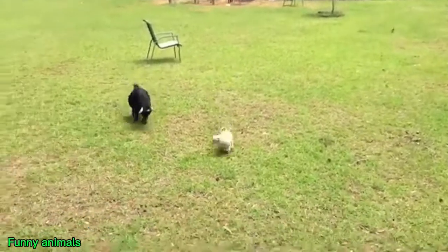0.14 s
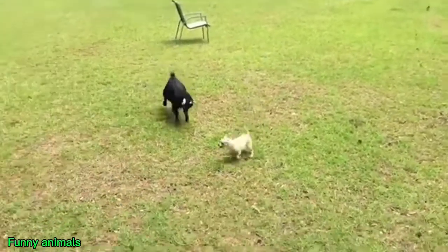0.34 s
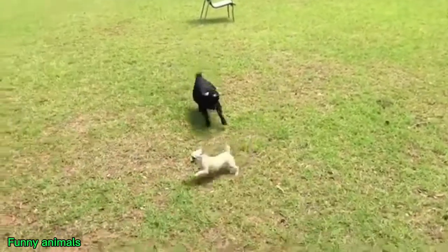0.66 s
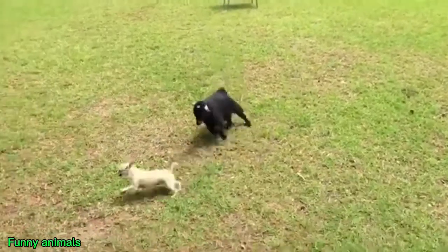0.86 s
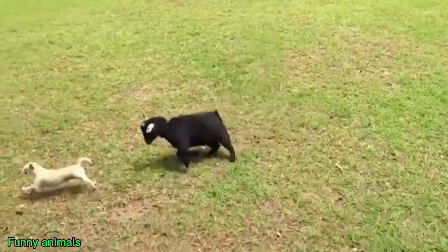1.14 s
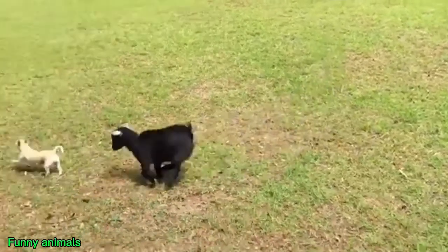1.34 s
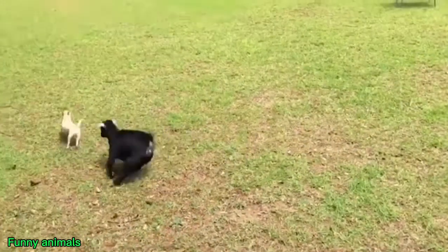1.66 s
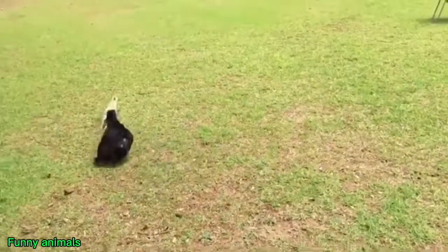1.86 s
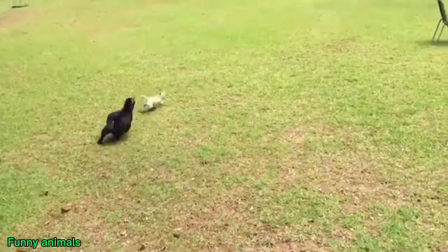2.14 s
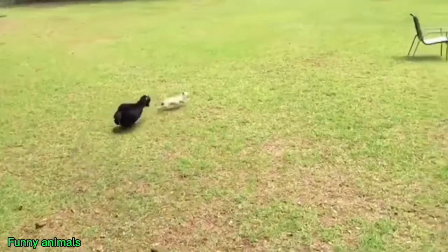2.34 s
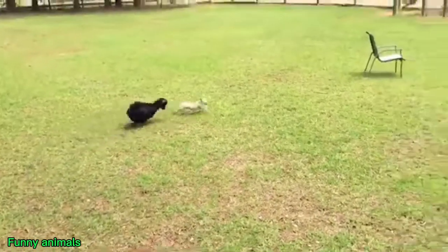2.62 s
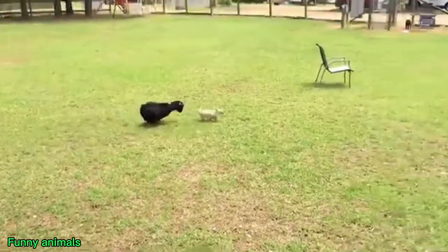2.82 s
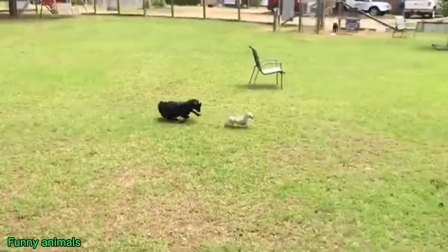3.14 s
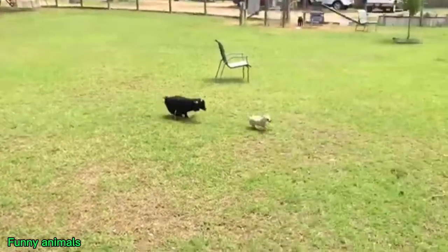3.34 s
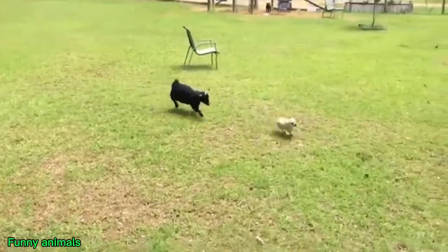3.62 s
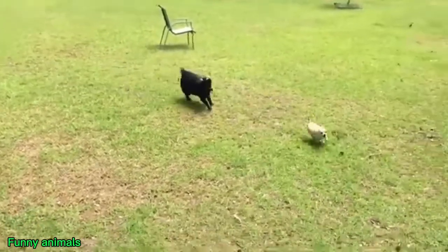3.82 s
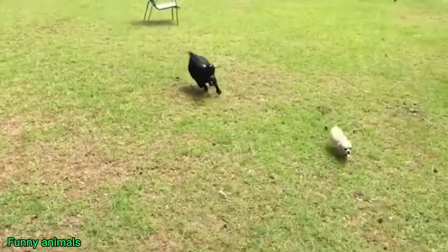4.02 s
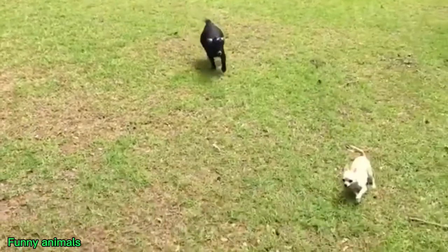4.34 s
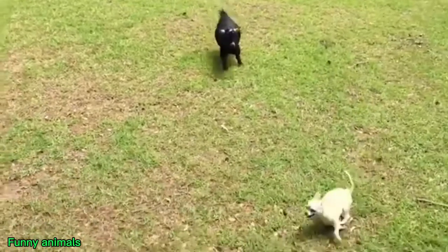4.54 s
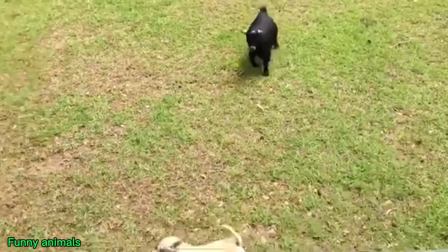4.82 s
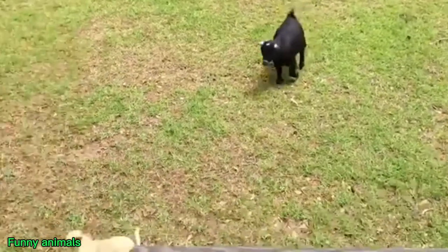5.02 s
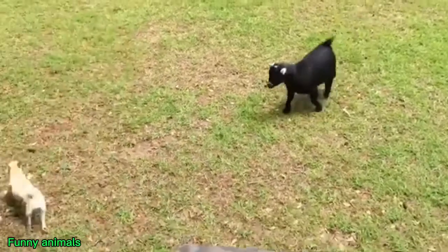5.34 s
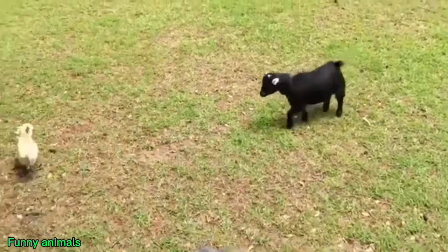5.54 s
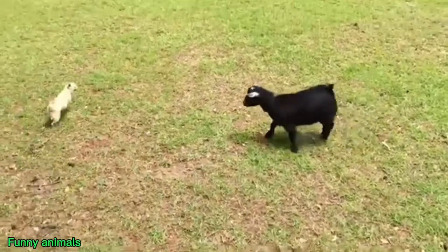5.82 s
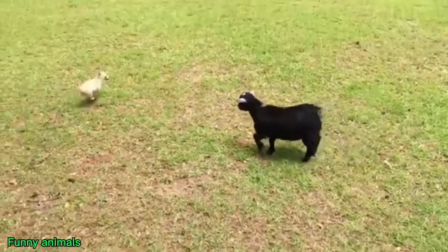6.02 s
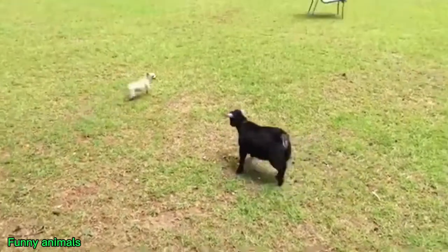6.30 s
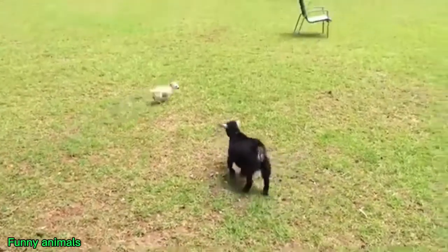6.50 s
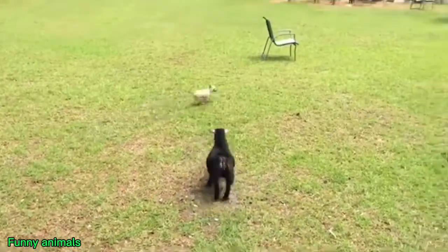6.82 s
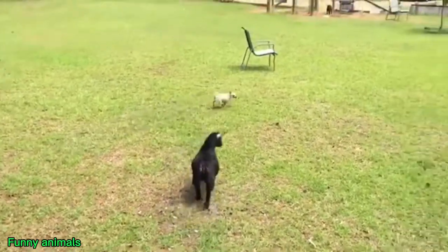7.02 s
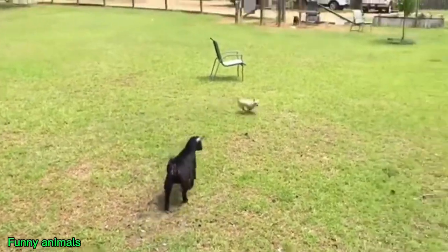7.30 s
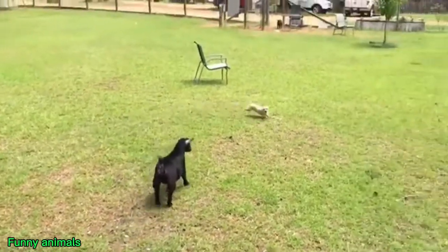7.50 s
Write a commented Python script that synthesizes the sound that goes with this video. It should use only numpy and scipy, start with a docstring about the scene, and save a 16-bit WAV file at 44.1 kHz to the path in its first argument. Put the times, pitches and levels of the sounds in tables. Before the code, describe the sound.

Echoing kennel-like barking runs on and off over a quiet dry-grass rustle with crisp little snaps and scuffs. Small puffs of panting come first, then a bright, shaky goat bleat of about nine throbs, scattered woofs, and a shorter, softer bleat of six. The ending gathers into quick high yaps, yelps and whines. A weak low motor drone lies far behind, with faint wind buffets on the phone microphone.

```python
"""Dogs bark and whine in an echoing kennel from the start; a small dog starts to pant in puffs of shaped noise.
Dry blades hiss, scuff and snap throughout, over a far motor of two wavering tones that swells near 2.8 s.
A goat kid gives a long trembling bleat from 2.1 s and a shorter one from 5.6 s: fold pulses through a throat.
Wind buffets softly near 4.4 s and 7.5 s. Barks are fold pulses through sliding mouth resonances plus a rasp."""
import sys
import numpy as np
from scipy import signal
from scipy.fft import rfft, irfft, next_fast_len
from scipy.io import wavfile
from scipy.ndimage import uniform_filter1d, map_coordinates

SR = 44100
rng = np.random.default_rng(int(sys.argv[2]) if len(sys.argv) > 2 else 0)


def store_pcm(level_fs):
    """Save levels as 16-bit WAV."""
    pcm = np.round(np.clip(level_fs, -1, 1) * 32767).astype(np.int16)
    wavfile.write(sys.argv[1], SR, np.atleast_2d(pcm).T)


N = 337850
TIME = np.arange(N) / SR
TOP_HZ = 15300  # band limit, also of the fold harmonics
LEAD_S = .4  # the dog track starts this much earlier

HARSH_ROUGH, WOOF_ROUGH, YAP_ROUGH = .62, .5, .25  # air share of amplitude
# ways of barking: opening and closing pitch / pitch at the loudest moment [ratio],
# shut / open mouth resonance [ratio], upper resonance and rasp [dB], rough [0-1]
HARSH = dict(opening=.85, closing=.92, shut=0.77, upper_db=-21, rasp_db=-11.5, rough=HARSH_ROUGH)
WOOF = dict(opening=1.12, closing=0.6, shut=0.676, upper_db=-2.5, rasp_db=-28, rough=WOOF_ROUGH)
YELP = dict(opening=.8, closing=0.63, shut=0.52, upper_db=-45, rasp_db=-27, rough=YAP_ROUGH)
YAP = dict(opening=1.04, closing=.85, shut=0.93, upper_db=-16.5, rasp_db=-27.5, rough=YAP_ROUGH)


def amp(db):
    """Decibels to gain."""
    return 10 ** (np.asarray(db) / 20)


def unit(x):
    """Scale to rms 1."""
    return x / np.sqrt(np.mean(x ** 2) + 1e-20)


def along(points, hz):
    """(f/Hz, value) points read on a log frequency axis."""
    f, v = np.transpose(points)
    return np.interp(np.log(hz + 1), np.log(np.maximum.accumulate(f) + 1), v)


def wobble(rate_hz, size):
    """Smooth random curve with rate_hz knots a second."""
    knots = rng.standard_normal(int(size * rate_hz / SR) + 4)
    return map_coordinates(knots, [np.arange(size) * rate_hz / SR])


def colour(x, points):
    """Minimum-phase filter with the gain of the (f/Hz, gain/dB) points."""
    size = 8192
    cepstrum = irfft(np.log(amp(along(points, np.fft.rfftfreq(size, 1 / SR)))))
    # fold onto positive time: causal
    cepstrum[1:size // 2] *= 2
    cepstrum[size // 2 + 1:] = 0
    impulse = irfft(np.exp(rfft(cepstrum)))[:size // 2]
    return signal.fftconvolve(x, impulse)[:len(x)]


def resonate(x, hz, width_hz):
    """One resonance of peak gain 1."""
    return signal.lfilter(*signal.iirpeak(hz, hz / width_hz, SR), x)


def cavity(x, modes):
    """Steep-sided resonances, each run twice, from (f/Hz, width/Hz, gain/dB) rows."""
    return sum(amp(db) * resonate(resonate(x, hz, width), hz, width) for hz, width, db in modes)


def glide(x, hz, count=5):
    """A moving resonance, cross-faded between fixed ones."""
    mouth_q = 4.2
    stops = np.linspace(hz.min() - 1, hz.max() + 1, count)
    shares = np.eye(count)
    return sum(np.interp(hz, stops, share) * resonate(x, stop, stop / mouth_q)
               for stop, share in zip(stops, shares))


def steady(x, size=900):
    """Hold the short-term rms at 1."""
    return x / np.sqrt(np.abs(uniform_filter1d(x ** 2, size)) + 1e-12)


def swells(rows):
    """Rounded swells from (t/s, level/dB, half width/s) rows."""
    return sum(amp(db) * np.exp(-.5 * np.abs((TIME - s) / w) ** 2.6) for s, db, w, *_ in rows)


def add(track, s, x):
    """Mix x into the track at time s."""
    i = max(round(s * SR), 0)
    track[i:i + len(x)] += x[:max(len(track) - i, 0)]


def folds(pitch_hz, rough):
    """Vocal folds: one pulse a cycle, mixed with air escaping in step; rough is the air's amplitude share."""
    phase = 2 * np.pi * np.cumsum(pitch_hz) / SR
    k = np.arange(1, int(TOP_HZ / pitch_hz.mean()) + 1)
    pulses = unit(np.cos(k[:, None] * phase).sum(0))
    air = unit(rng.standard_normal(len(pitch_hz)) * (1 + np.cos(phase)))
    rough = np.clip(rough, 0, 1)
    return np.sqrt(1 - rough ** 2) * pulses + rough * air


def echo(x, t60, delay_s):
    """A diffuse tail in which each frequency dies at its own speed; keeps the level of x."""
    hz, t, z = signal.stft(rng.standard_normal(2 * SR), SR, nperseg=256)
    decay = amp(-60 * t / along(t60, hz)[:, None])
    tail = signal.istft(z * decay, SR, nperseg=256)[1]
    tail *= 1 - np.exp(-(np.arange(len(tail)) / SR / delay_s) ** 2)
    return unit(signal.fftconvolve(x, tail)[:len(x)]) * np.std(x)


def wind():
    """Wind nudging the microphone: soft low buffets of noise."""
    # t/s, level/dB, half width/s
    gusts = [(4.45, -62, 0.23), (7.51, -50, 0.03)]
    buffet = colour(rng.standard_normal(N), [(20, -29), (50, 17), (100, 3), (200, -4), (800, -43)])
    return swells(gusts) * unit(buffet)


def motor():
    """A distant motor: a wavering tone and its lower partner over a soft rumble."""
    # rumble spectrum: f/Hz, gain/dB
    hum = [(15, -61), (25, -25), (60, -12), (130, 0), (200, -11.5), (300, -15.5), (420, -27), (600, -30),
           (1000, -33), (1600, -36), (2500, -37.5), (5500, -100)]

    def tone(hz):
        wave = np.sin(2 * np.pi * np.cumsum(hz + 4 * wobble(25, N)) / SR)
        return unit(wave * amp(3.8 * wobble(27, N)))

    nearness = amp(np.interp(TIME, [0, 2.8, 4.2, 7.6], [-57.5, -51.5, -63.5, -74]))
    rumble = unit(colour(rng.standard_normal(N), hum))
    return nearness * tone(hz=140.2) + amp(-64.5) * tone(hz=75.3) + amp(-56.0) * rumble


def grass():
    """Dry blades: a restless hiss with tiny cracks, scuffs of the feet, and short dry snaps."""
    # rustle, grows as the animals come near: t/s, level/dB before mixing and stirring
    approach = [(0, -68), (.6, -72), (1.1, -68), (2.4, -67.5), (3.0, -68), (4.1, -72), (4.5, -68),
                (5.3, -69.5), (6.3, -73), (7.66, -73.5)]
    # blade spectrum: f/Hz, gain/dB
    blades = [(900, -4), (2500, 0), (5000, 5), (8000, 2.5), (12000, 3), (15500, 2.5)]
    # feet dragging: t/s, level/dB before mixing, half width/s
    scuffs = [(.17, -58, 0.014), (.468, -56, 0.0066), (.95, -62.5, 0.022), (3.16, -60, 0.023),
              (4.41, -76, 0.024), (4.566, -57.5, 0.023), (5.175, -59.5, 0.0077), (5.222, -57.5, 0.014),
              (5.39, -59.5, 0.01), (5.51, -62, 0.0041)]
    # loudest blades snapping underfoot: t/s, peak/dB, ring f/Hz
    snaps = [(.823, -52, 5440), (0.855, -45, 8600), (1.101, -43.5, 5470), (1.236, -49, 8070),
             (1.369, -46.5, 5540), (1.497, -40, 9400), (1.515, -40.5, 7500), (1.92, -41, 9700),
             (2.8835, -44, 4460), (3.115, -43.5, 9500), (3.273, -37, 4700), (3.514, -43.5, 5460),
             (4.098, -50, 5080), (4.356, -40.5, 6500), (4.6253, -40.5, 4830), (4.9664, -43.5, 4550),
             (5.1585, -38.5, 8760), (5.335, -51.5, 4470)]

    def swing(db, rate_hz):
        return amp(db * np.tanh(wobble(rate_hz, N) / 2))

    cracks = (rng.random(N) < 1800 / SR) * rng.standard_normal(N) * swing(14, 45)  # 1800 per s
    hiss = unit(colour(rng.standard_normal(N), blades))
    rustle = amp(-0.5) * hiss + amp(1.0) * unit(colour(cracks, blades))
    stir = swing(6, 13)
    ticks = unit(swing(11, 130))  # a scuff breaks into single blades
    out = rustle * (stir * amp(np.interp(TIME, *np.transpose(approach))) + ticks * swells(scuffs))
    t = TIME[:SR // 20]
    snap_shape = amp(-60 * t / 0.022) * (1 - np.exp(-t / 0.002))
    for s, db, hz in snaps:
        burst = rng.standard_normal(len(t)) * snap_shape
        snap = colour(burst, blades) + 6 * resonate(burst, hz, width_hz=600)
        add(out, s - .001, snap / np.abs(snap).max() * amp(db))
    return out


def whines():
    """Thin arching whines: a strong fundamental, an octave that grows with effort; faint ones quaver most."""
    # t/s, length/s, mid pitch f/Hz, glide/Hz, level/dB
    rows = [(.014, .069, 1054, 276, -46), (.565, .08, 1060, 360, -41), (.667, .053, 1000, -176, -50),
            (2.8, .26, 1345, -50, -62), (3.23, .28, 1235, -30, -64), (5.35, .2, 1220, -28, -60),
            (7.1, .166, 1185, 0, -49), (7.11, .1, 2930, 260, -60), (7.452, .075, 1100, 350, -41.5),
            (7.465, .09, 2930, 360, -60), (7.53, .072, 1200, -62, -49)]
    arch, octave_db = 0.033, -15  # share by which both ends lie low; octave in the loudest whine
    out = np.zeros(N + round(LEAD_S * SR))
    loudest_db = max(db for *_, db in rows)
    for s, length_s, hz, glide_hz, db in rows:
        u = np.linspace(-1, 1, int(length_s * SR))
        quaver_hz = 18 + 1.1 * (loudest_db - db)
        pitch_hz = hz * (1 - arch * u ** 2) + glide_hz * (u / 2 - u ** 2 / 10)
        pitch_hz = pitch_hz + quaver_hz * wobble(300, len(u))
        phase = 2 * np.pi * np.cumsum(pitch_hz) / SR
        octave = np.sin(2 * phase) * wobble(403.0, len(u))  # hoarse
        tone = np.sin(phase) + amp(octave_db + db - loudest_db) * octave
        level = amp(db + 3 * wobble(70, len(u))) * signal.windows.tukey(len(u), .6)
        add(out, LEAD_S + s, unit(tone) * level)
    return out


def bark(rise_s, fall_s, loudest_hz, mouth_hz, opening, closing, shut, upper_db, rasp_db, rough):
    """Clearest at its loudest moment, then the mouth resonances slide as it dies; gives lead in s and sound."""
    # f/Hz, gain/dB
    throat = [(150, -22), (300, -7), (450, 2), (600, 1.5), (1050, -1), (1350, -7.5), (1700, -5.5),
              (2050, -14.5), (2600, -43), (5000, -68)]
    # hoarse resonances above the mouth's own: f/Hz, width/Hz, gain/dB
    rasp_modes = [(1950, 600, -5), (2540, 460, 0), (3950, 420, -13), (5300, 220, -18), (6200, 600, -19),
                  (8450, 700, -23), (9640, 600, -32)]
    upper_ratio, flutter_hz = 1.585, 149  # second / first mouth resonance; mean rate of rasp slaps
    t = np.arange(-3 * rise_s, 2.28 * fall_s, 1 / SR)
    n = len(t)
    u = np.abs(t) / np.where(t < 0, rise_s, fall_s)
    effort = np.exp(-np.where(t < 0, 0.44 * u ** 1.59, 0.73 * u ** 0.94)) * signal.windows.tukey(n, .2)
    away = np.minimum(u / 1.9, 1) ** 1.3  # 0 at the loudest moment, 1 at the ends

    pitch_hz = loudest_hz * (1 + away * (np.where(t < 0, opening, closing) - 1))
    pitch_hz = pitch_hz * (1 + .06 * rough * wobble(260, n) + .07 * away * wobble(70, n))
    voice = colour(folds(pitch_hz, rough + np.where(t < 0, .5, .3) * away), throat)

    mouth = mouth_hz * (1 + away * (t > 0) * (shut - 1)) * (1 + .08 * away * wobble(50, n))
    upper = glide(voice, upper_ratio * mouth) * amp(upper_db + 4 * wobble(60, n))
    body = steady(glide(voice, mouth) + upper + .15 * voice, size=300)

    slap_phase = 2 * np.pi * np.cumsum(flutter_hz * (1 + .25 * wobble(120, n))) / SR
    slaps = 1 + .4 * np.cos(slap_phase)
    rasp = unit(cavity(folds(pitch_hz, rough=0.75) * slaps, rasp_modes)) * amp(rasp_db)
    shimmer = amp(5 * rough * np.tanh(wobble(130, n)))
    return -t[0], (body + rasp) * effort * shimmer


def barks():
    """The dogs give harsh barks, falling woofs, yelps and clear yaps."""
    # t/s of the loudest moment, level/dB before the trim, rise/s, fall/s,
    # pitch f/Hz at the loudest moment, mouth f/Hz, manner
    rows = [(-.14, -28, 0.025, 0.065, 576, 950, HARSH), (.182, -39, 0.0095, 0.018, 219.2, 211, YELP),
            (.21, -37.5, .012, 0.023, 397.4, 780, YAP), (.23, -40.5, 0.016, 0.011, 351.3, 377, YELP),
            (0.306, -31, 0.036, 0.029, 571.7, 620, HARSH), (.922, -29.5, 0.014, 0.021, 319.8, 650, YAP),
            (.946, -35, 0.0087, 0.011, 296.7, 890, YAP), (.985, -35, 0.018, 0.033, 288.3, 580, WOOF),
            (1.416, -30.5, 0.021, 0.045, 523.1, 1020, HARSH),
            (1.745, -32.5, 0.021, 0.0322, 315.1, 920, YAP), (2.17, -35.5, 0.023, 0.055, 297.3, 594, WOOF),
            (2.628, -39.5, 0.017, 0.025, 290, 604, WOOF), (2.678, -39, 0.012, 0.035, 263.5, 523, WOOF),
            (3.104, -36, .02, 0.052, 284.1, 538, WOOF), (4.286, -34, .023, 0.055, 303.4, 617, WOOF),
            (4.778, -32, 0.019, 0.01, 292.5, 600, YAP), (4.828, -40, .018, 0.035, 273.3, 596, WOOF),
            (6.49, -46.5, 0.016, 0.0186, 398, 810, YAP), (6.56, -35.5, 0.025, 0.032, 407.2, 760, YELP),
            (6.812, -30, 0.029, 0.035, 503.4, 980, HARSH), (7.04, -32, .017, 0.021, 663, 740, YAP),
            (7.08, -35.5, .012, 0.033, 567, 650, YAP), (7.305, -34.5, 0.035, 0.02, 513, 533, YELP),
            (7.352, -36, 0.014, 0.017, 736, 764, YELP), (7.385, -35.5, 0.018, 0.053, 641.7, 786, YAP),
            (7.644, -32.5, 0.012, 0.034, 661, 674, YELP)]
    trim_db = -0.5
    out = np.zeros(N + round(LEAD_S * SR))
    for s, db, rise_s, fall_s, loudest_hz, mouth_hz, manner in rows:
        lead_s, sound = bark(rise_s, fall_s, loudest_hz, mouth_hz, **manner)
        add(out, LEAD_S + s - lead_s, sound * amp(db + trim_db))
    return out


def kennel():
    """The kennel's walls smear the dogs and its hall rings on."""
    # f/Hz, T60/s
    walls_t60 = [(200, 0.032), (1000, 0.18), (8000, 0.24)]
    # f/Hz, T60/s
    hall_t60 = [(200, 0.36), (550, 1.38), (1000, 1.92), (1700, 1.76), (2600, 1.87), (4000, 0.18),
                (10000, 0.13)]
    # hall spectrum: f/Hz, gain/dB
    hall_colour = [(250, -0.5), (570, 1.5), (760, -1), (950, -0.5), (1200, 2), (1700, 8), (2500, 2.5),
                   (5000, -17)]
    dogs = barks() + whines()
    walls = amp(-8) * echo(dogs, walls_t60, delay_s=.004)
    hall = amp(-7.5) * echo(colour(dogs, hall_colour), hall_t60, delay_s=0.0033)
    return (dogs + walls + hall)[-N:]


def panting():
    """Short puffs of air whistle through three resonances of the small dog's open muzzle."""
    # t/s, level/dB, muzzle f/Hz
    puffs = [(0.637, -38.5, 1940), (.872, -41.5, 2210), (1.127, -48.5, 2370), (1.338, -58.5, 2340),
             (2.954, -62, 2440), (3.173, -57, 2710), (3.396, -60.5, 2500), (3.622, -59, 2567),
             (3.861, -58, 2490), (4.125, -63.5, 2660), (4.358, -53, 2530), (6.335, -58.5, 2470),
             (7.375, -45.5, 2400)]
    # upper muzzle resonances: f/Hz, width/Hz, gain/dB
    muzzle = [(3800, 880, -9), (5440, 1600, -17.5)]
    # plain breath: f/Hz, gain/dB
    breath = [(800, -35), (1600, -7), (3000, -25.5), (6500, -37), (15000, -51)]
    half_width_s = 0.015
    out = np.zeros(N)
    t = np.arange(-3 * half_width_s, 3 * half_width_s, 1 / SR)
    swell = np.exp(-.5 * (t / half_width_s) ** 2)
    for s, db, hz in puffs:
        air = rng.standard_normal(len(t))
        hollow = cavity(air, [(hz, 480, 0), *muzzle]) + colour(air, breath)
        add(out, s + t[0], unit(hollow) * swell * amp(db))
    return out


def bleat(throbs, throat, rough, sag):
    """About twelve throbs a second; each swells, arches in pitch, then sags and cracks, more as breath ends."""
    pitch_lead_s = .011  # pitch peaks before level
    tired_rough_per_db = .006  # weak throbs are hoarser
    when, hz, db, rises, falls, lift_db = np.transpose(throbs)
    t = np.arange(when[0] - .06, when[-1] + .07, 1 / SR)
    n = len(t)

    def shapes(t):
        return np.array([np.exp(-.5 * np.abs((t - s) / np.where(t < s, rise, fall)) ** 2.6)
                         for s, rise, fall in zip(when, rises, falls)])

    slack = 1 - shapes(t + pitch_lead_s).max(0)
    spent = np.linspace(0, 1, n) ** 2
    tired = tired_rough_per_db * (db.max() - np.interp(t, when, db))
    jitter = (.0012 + .016 * (rough + tired)) * wobble(140, n) + .003 * wobble(35, n)
    pitch_hz = np.interp(t, when, hz) * (1 + jitter - sag * slack ** 2)

    # a cracking voice alternates strong and weak cycles
    crack = tired + .5 * slack * spent
    alternation = 1 + crack * np.cos(np.pi * np.cumsum(pitch_hz) / SR)
    cycles = folds(pitch_hz, rough + tired + .3 * slack ** 3) * alternation
    voice = colour(cycles, throat)
    low = signal.sosfiltfilt(signal.butter(4, 2700, fs=SR, output="sos"), voice)
    voice = voice + (amp(np.interp(t, when, lift_db)) - 1) * low

    # the bounce off the lawn changes its delay as the kid runs, so the overtones trade strength
    bounce_s = .0024 + 0.000098 * wobble(8.7, n)
    voice = voice + .4 * map_coordinates(voice, [np.arange(n) - bounce_s * SR])
    out = np.zeros(N)
    add(out, t[0], unit(voice) * amp(1.2 * wobble(100, n)) * (amp(db) @ shapes(t)))
    return out


def kid():
    """The goat kid's two bleats: fold pulses through a throat, the second breathier."""
    # throbs: t/s, pitch f/Hz, level/dB, rise/s, fall/s, lift below 2.7 kHz/dB
    long_throbs = [(2.128, 528, -41, 0.014, 0.017, -13), (2.218, 555, -39.5, .028, 0.027, 2),
                   (2.293, 566, -36, 0.024, 0.019, -11), (2.372, 571.3, -37, 0.033, 0.026, -3),
                   (2.455, 568, -36.5, 0.0357, 0.0318, -6.5), (2.535, 571, -37.5, 0.024, 0.033, 0),
                   (2.622, 569.4, -40, 0.0198, .026, 5.5), (2.738, 540, -45.5, 0.027, .018, 5.5),
                   (2.813, 555, -46, 0.029, .022, 8.5)]
    # same columns
    short_throbs = [(5.662, 502, -51.5, 0.0141, 0.0121, 10), (5.75, 532, -45, 0.02, 0.016, -3),
                    (5.836, 551, -42.5, 0.023, 0.018, -4.5), (5.918, 557.5, -42.5, 0.023, .017, 2.5),
                    (6.0, 563, -41.5, .02, 0.024, -2.5), (6.091, 546, -42.5, .024, 0.021, 2)]
    # throat in the long bleat: f/Hz, gain/dB
    long_throat = [(560, -36), (1130, -16), (1700, -6), (2300, -15), (2850, -16.5), (3500, -7.5),
                   (4600, -1.5), (5200, -2.5), (6250, 7.5), (7500, -8), (9600, -10.5), (11200, -11),
                   (12600, -17), (14000, -40)]
    # throat in the short bleat: f/Hz, gain/dB
    short_throat = [(550, -17), (1100, -6.5), (1650, -5), (2200, -23), (2750, -15), (3350, -7), (4450, 1.5),
                    (5000, -5.5), (6100, 6.5), (7250, -6), (8400, -11.5), (9500, -16.5), (11000, -29),
                    (14000, -58)]
    first = bleat(long_throbs, long_throat, rough=0.03, sag=0.035)
    second = bleat(short_throbs, short_throat, rough=0.15, sag=0.035)
    return first + second


def scene():
    """Sum of all sources; the open yard answers the kid and the small dog faintly."""
    # f/Hz, T60/s
    yard_t60 = [(200, 0.27), (3000, 0.7), (6500, 0.39), (12000, 1)]
    near = kid() + panting()
    yard = near + amp(-15) * echo(near, yard_t60, delay_s=.012)
    return (yard + kennel() + grass() + motor() + wind())[None]


def record(dry):
    """The phone keeps nothing above its band limit, TOP_HZ."""
    size = next_fast_len(N + SR // 2)
    passed = np.fft.rfftfreq(size, 1 / SR) < TOP_HZ
    return irfft(rfft(dry, size) * passed, size)[:, :N]


dry = scene()
out = record(dry)
store_pcm(out)
```